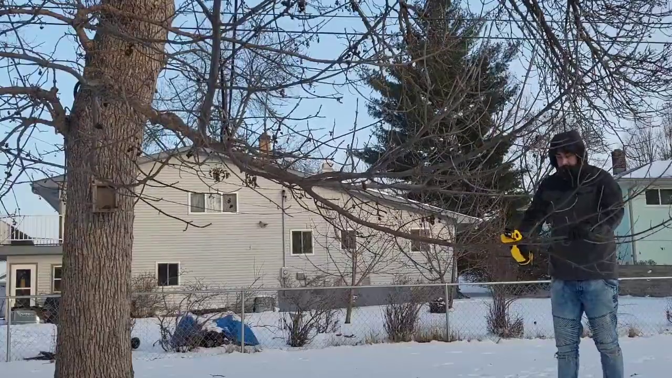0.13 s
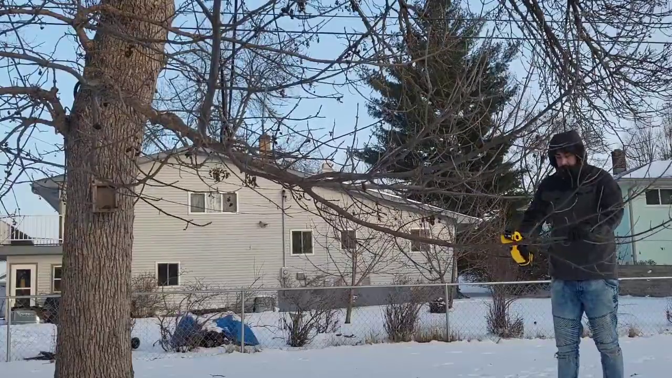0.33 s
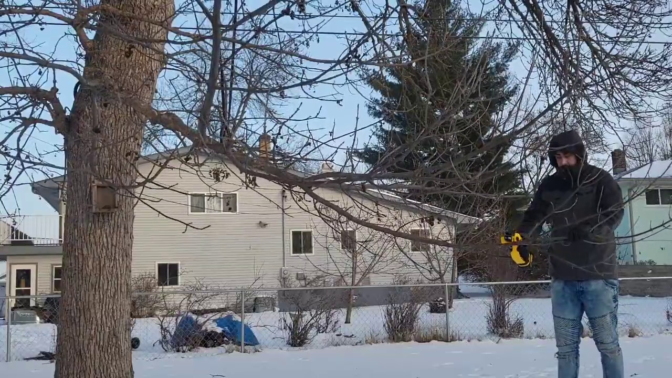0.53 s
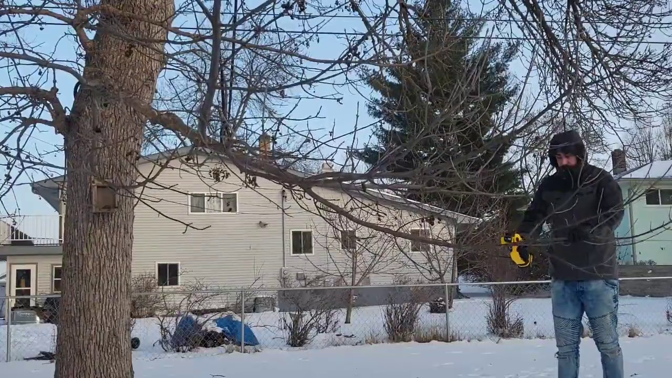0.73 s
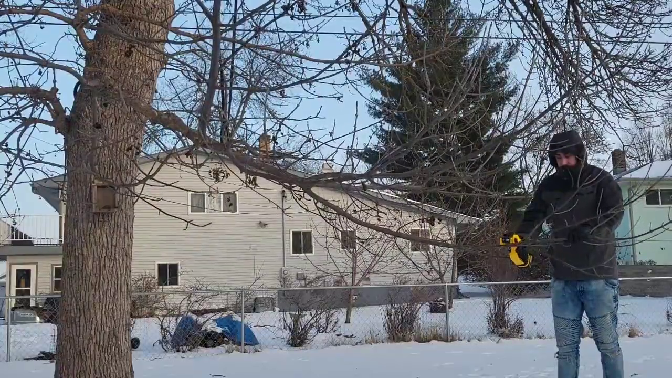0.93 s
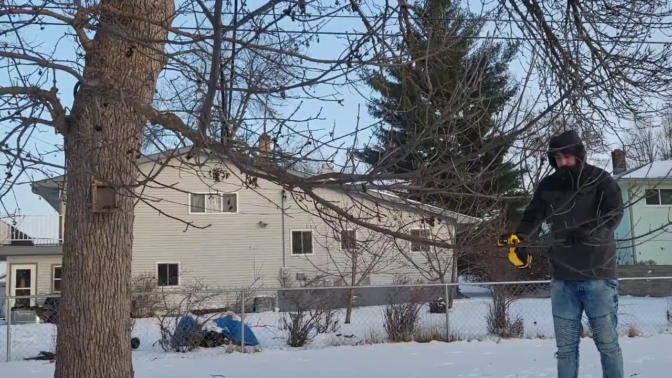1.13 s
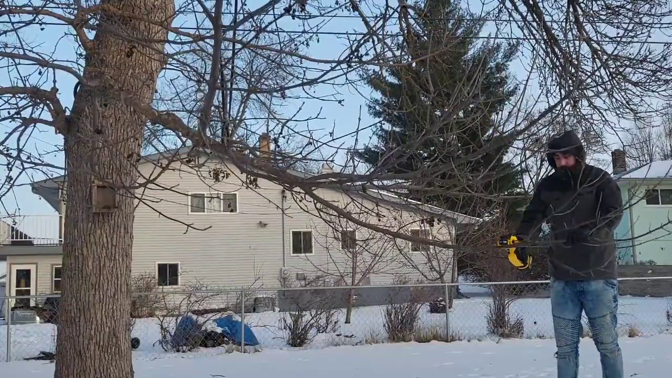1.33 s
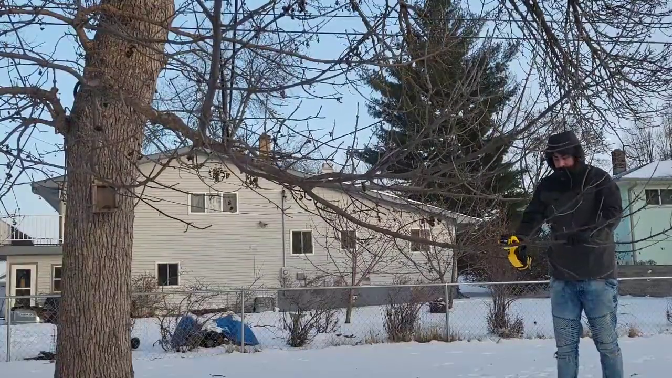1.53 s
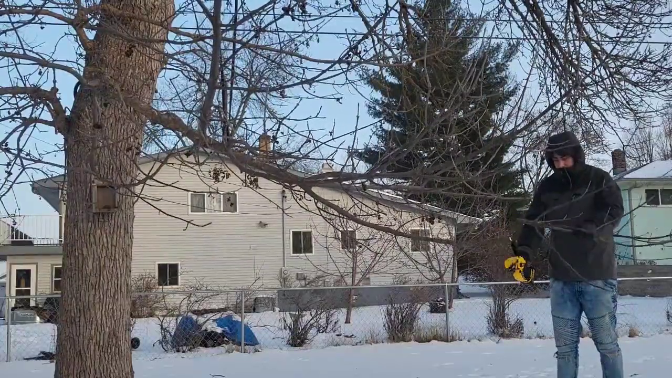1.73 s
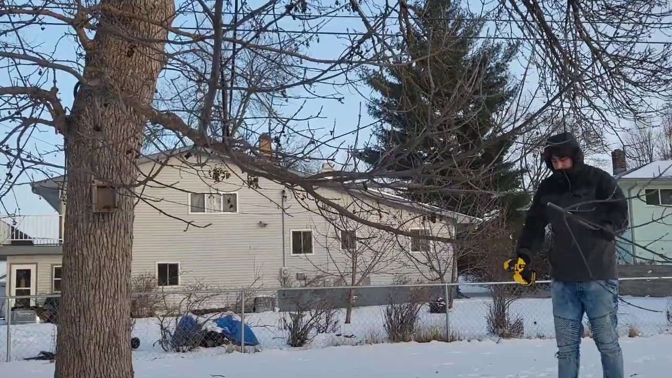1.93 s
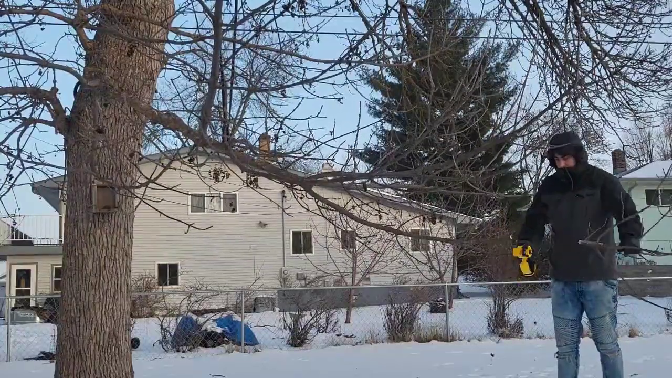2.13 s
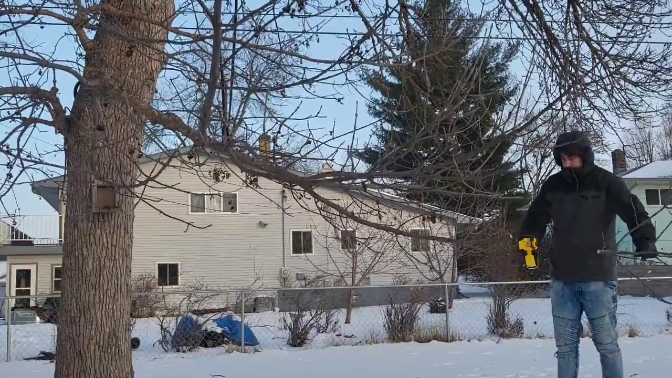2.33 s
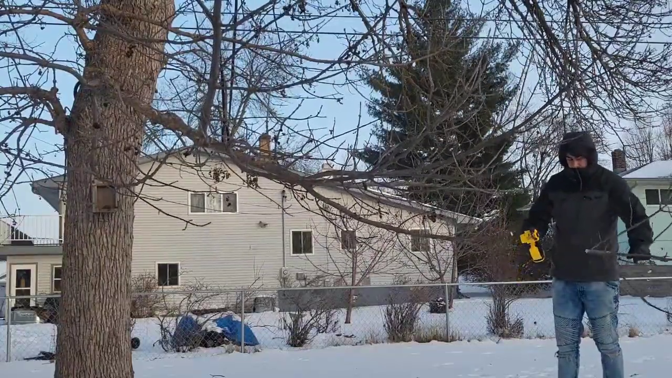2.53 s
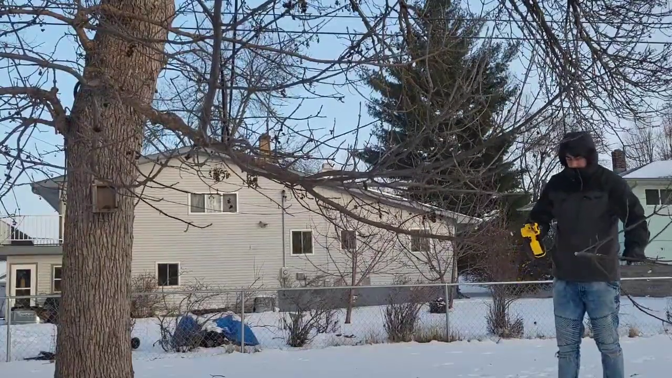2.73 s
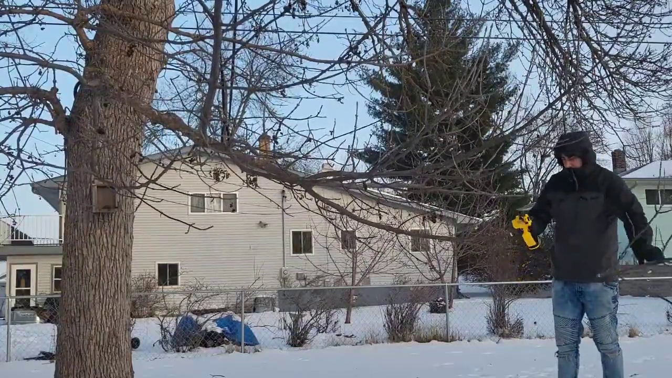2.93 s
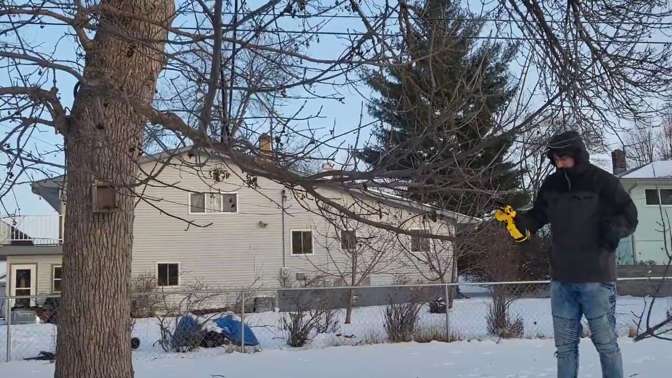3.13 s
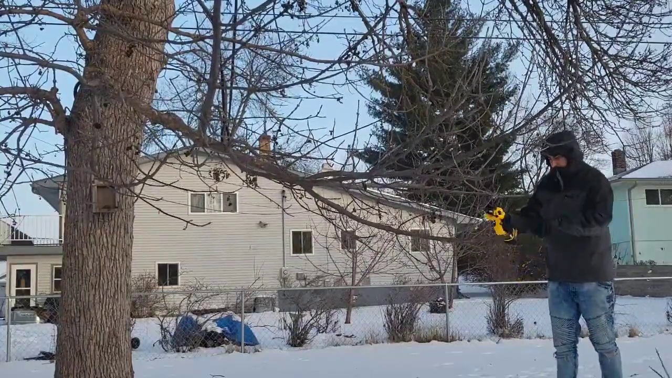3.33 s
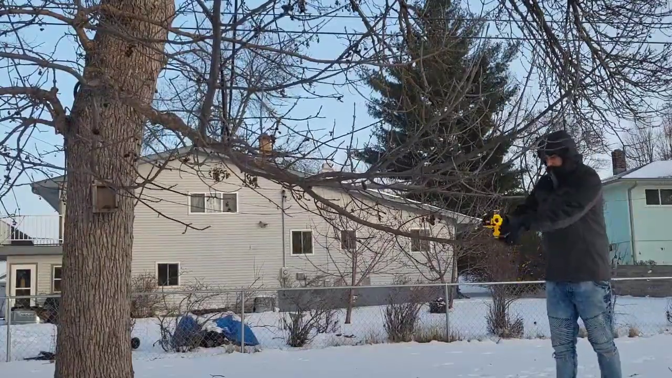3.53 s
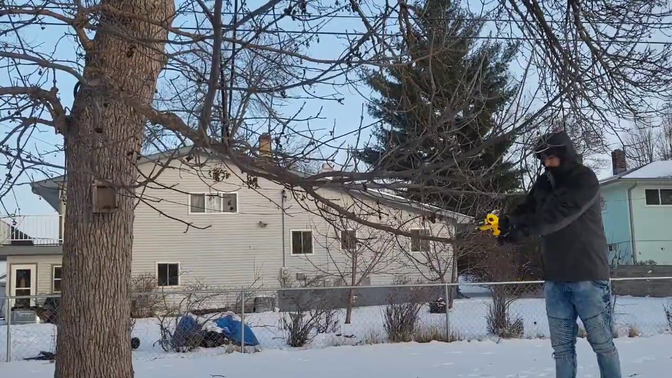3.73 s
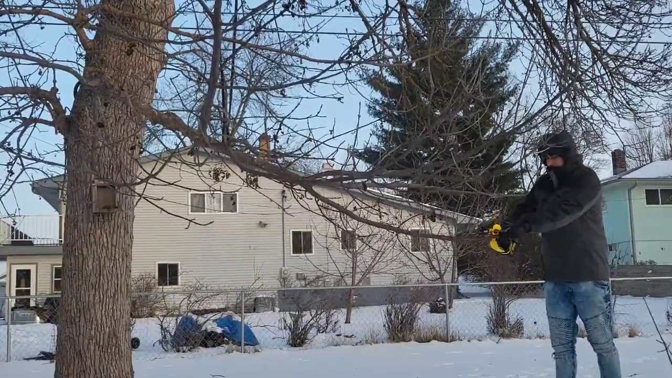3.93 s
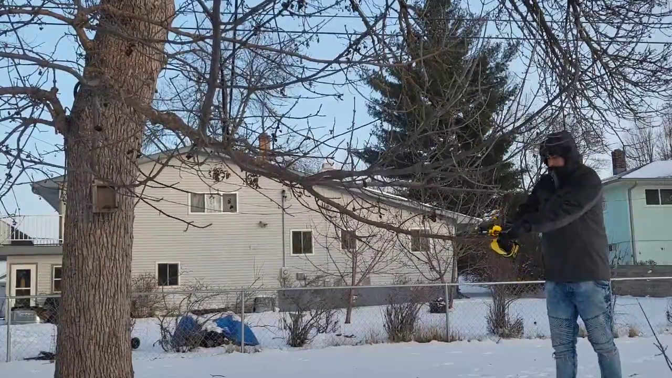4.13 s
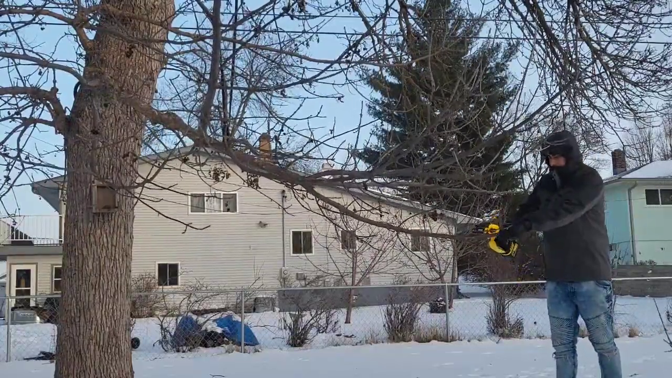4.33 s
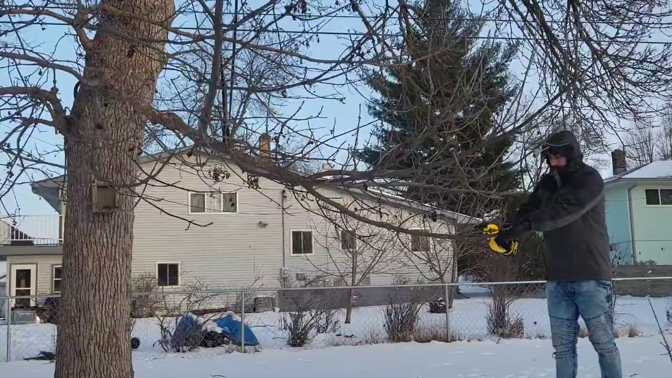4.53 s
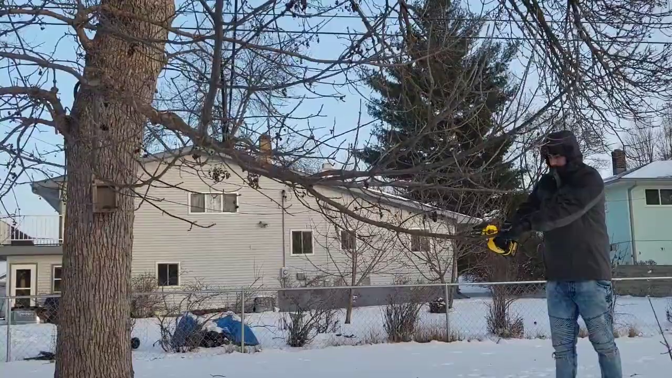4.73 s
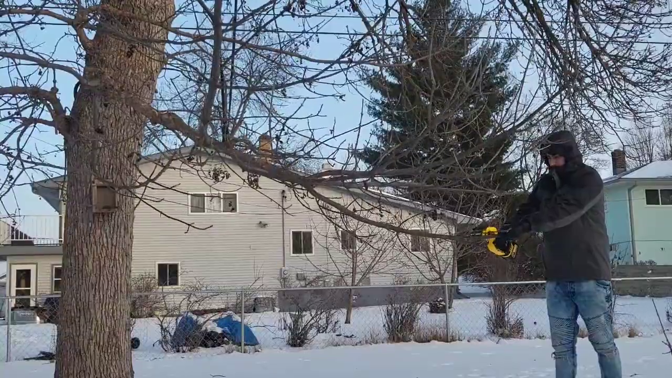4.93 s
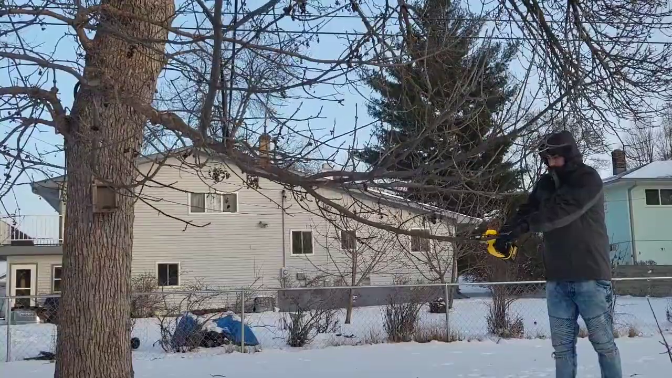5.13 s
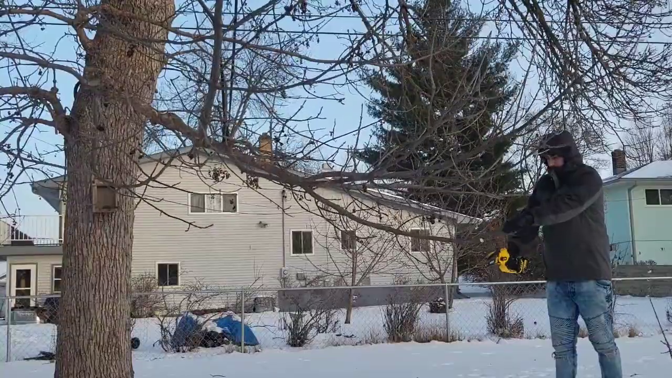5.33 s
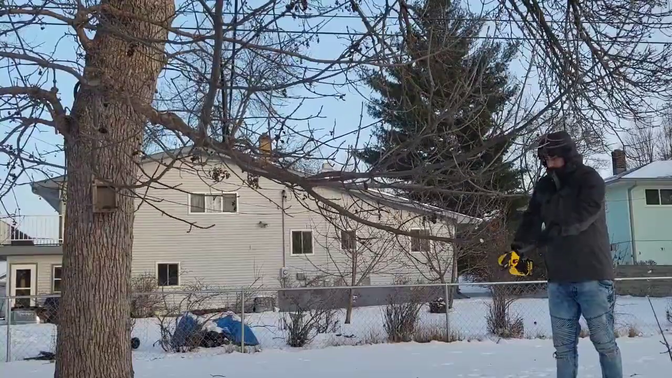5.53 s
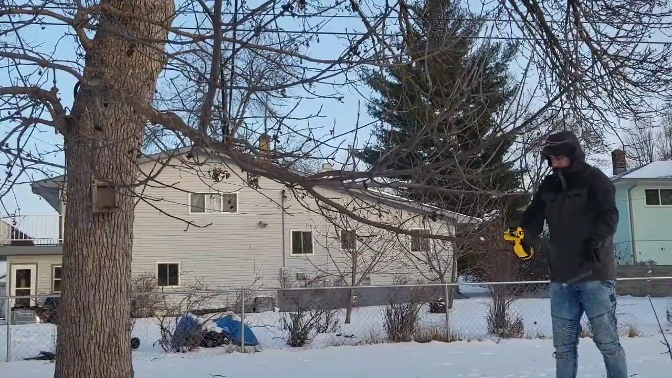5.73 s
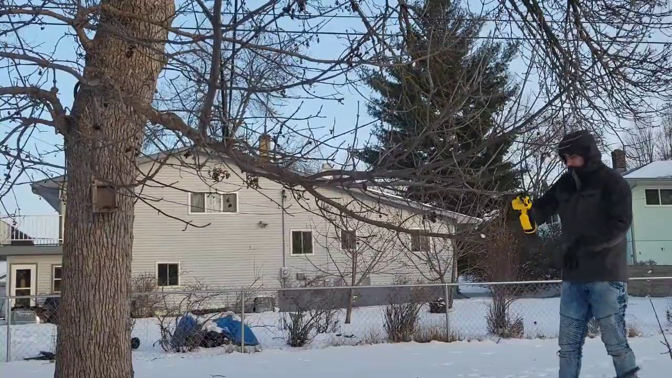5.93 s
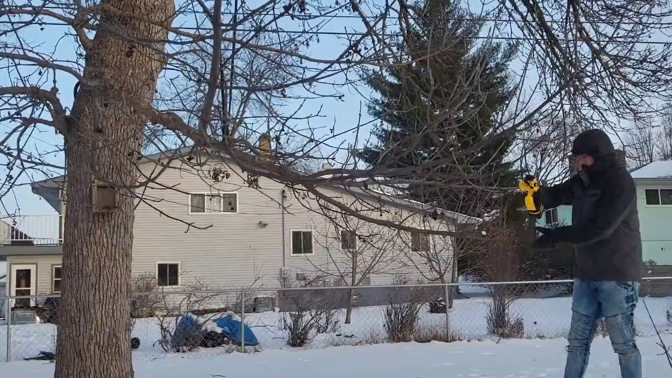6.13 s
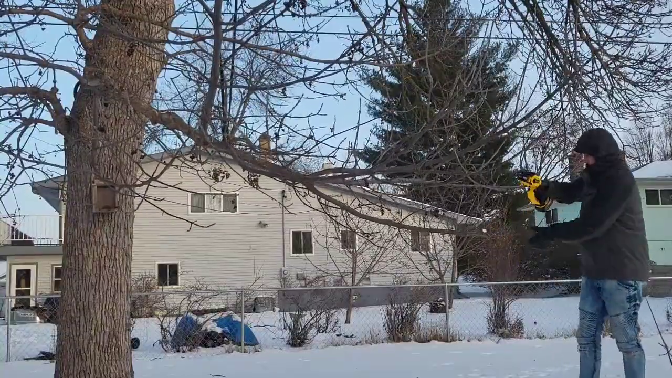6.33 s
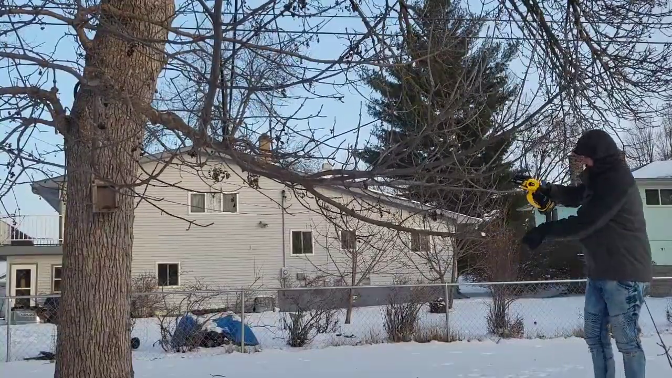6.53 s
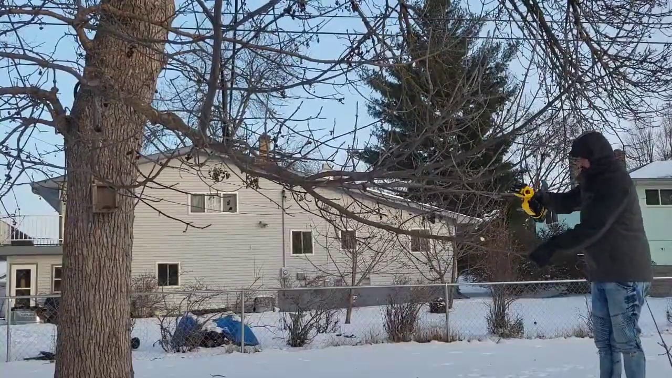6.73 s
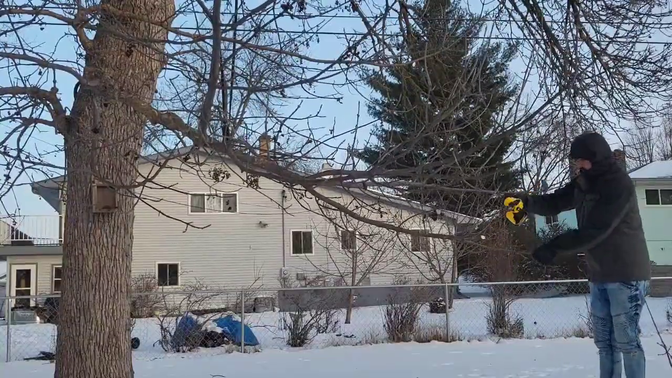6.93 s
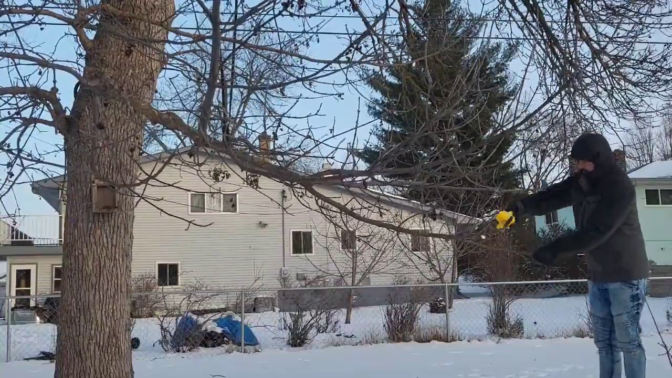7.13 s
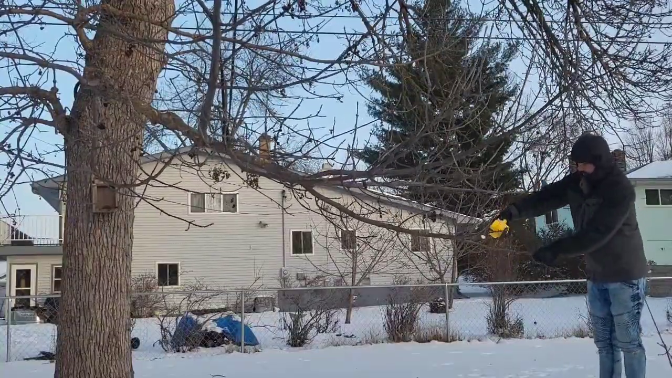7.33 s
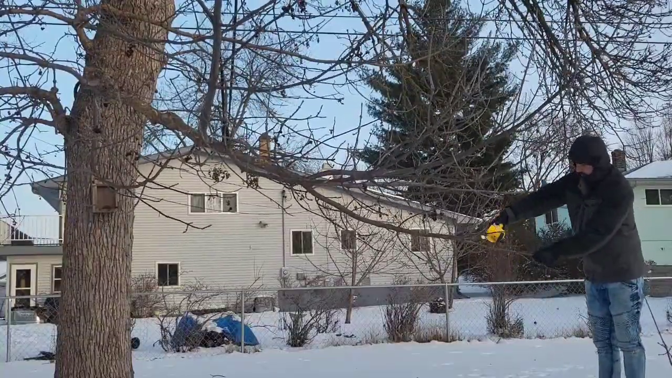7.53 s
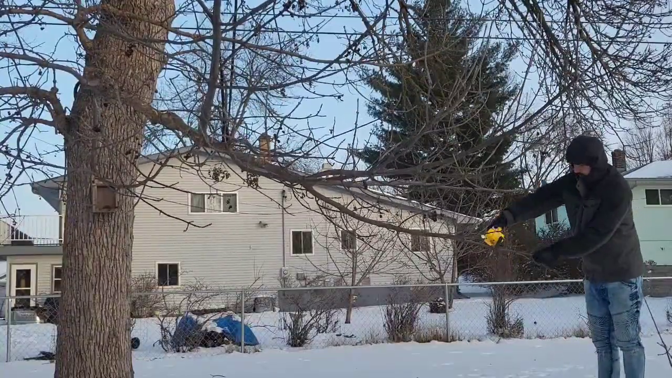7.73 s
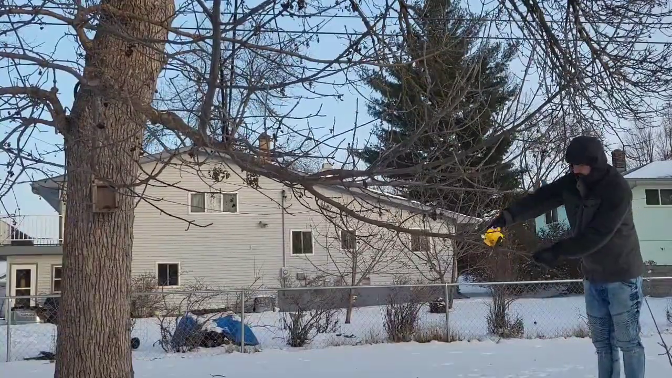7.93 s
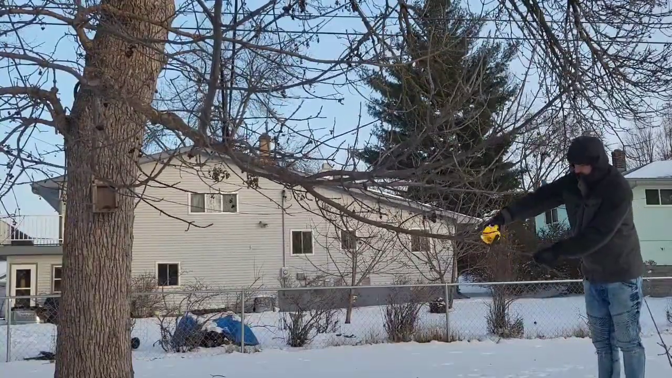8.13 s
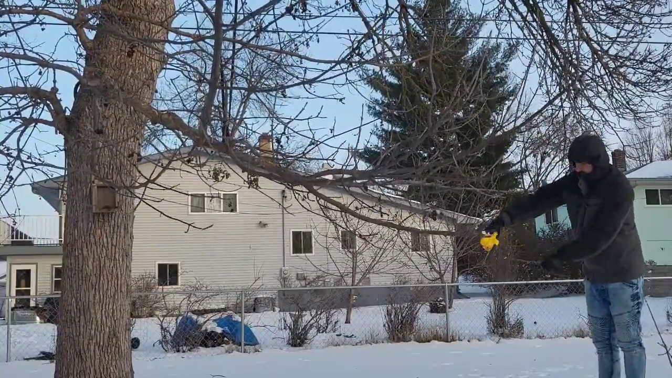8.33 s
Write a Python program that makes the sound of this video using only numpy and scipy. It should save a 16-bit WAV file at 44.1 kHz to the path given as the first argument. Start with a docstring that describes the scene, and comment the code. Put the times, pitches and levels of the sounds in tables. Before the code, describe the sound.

Outdoors, a rattling battery chainsaw runs, bites wood and stops abruptly three times, separated by quiet pauses of wind puffs and falling twigs.

```python
"""A small chainsaw trims twigs three times in a snowy yard, to the left of a two-port microphone.
The chain rattles as grains of noise ringing the bar and housing, with motor tones beneath it.
Tooth blows shake the wood and throw chips; twigs snap, rustle and land in the snow as short bursts.
Puffs of wind thump each port over a faint town hum, and house walls send a short tail back."""
import sys
import numpy as np
from scipy import signal
from scipy.fft import rfft, irfft
from scipy.io import wavfile
from scipy.ndimage import uniform_filter1d

SR = 44100
rng = np.random.default_rng(int(sys.argv[2]) if len(sys.argv) > 2 else 0)


def digitize_waveform(pressure):
    """Quantize a signal to 16-bit integers and store it at the path in sys.argv[1].

    Rows of a 2-D input are taken as channels; values are limited to [-1, 1].
    """
    field = np.atleast_2d(pressure).T
    bounded = np.clip(field, -1, 1)
    quanta = np.round(bounded * 32767).astype(np.int16)
    wavfile.write(sys.argv[1], SR, quanta)


def gain_from_db(level_db):
    """Turn a decibel level (scalar or array-like) into a linear amplitude factor."""
    decades = np.asarray(level_db, float) / 20
    return 10 ** decades


N = 369116
T = np.arange(N) / SR  # time in s

# Trigger pulls: on t/s, off t/s, spin-up time/s, chain level at full speed/dB,
# tilt of the case ring as the saw is turned [dB per octave]
RUNS = [(-.17, 1.94, .2, -32, -0.2), (4.15, 5.465, .18, -33.5, -1), (7.37, 8.6, .26, -33.5, 3)]
# The hand presses the bar into the wood, one list per cut: t/s, pressure/dB
FEED = [
    [(.57, -27.5), (.62, -10), (.84, -10), (.92, -1.5), (1.3, -4.5), (1.6, 1.5), (1.66, -7)],
    [(4.28, -20.5), (4.4, -10), (4.5, -4), (4.6, -0.2), (5.05, -3), (5.24, 1), (5.28, -19.5)],
    [(7.655, -21), (7.67, -6), (7.9, 3), (8.1, 2.5), (8.18, -6), (8.28, -4.5), (8.31, -5.5)],
]


def evened(x):
    """Scales to rms 1."""
    return x / np.sqrt(np.mean(x ** 2) + 1e-20)


def read(points, hz, order=1):
    """Reads one column of a table, joining its points along a log-frequency axis."""
    table = np.transpose(points)
    return np.interp(np.log(hz + 1), np.log(table[0] + 1), table[order])


def track(tables, order=1, rest=-120):
    """Joins one column of several curves into one control over time, at rest elsewhere."""
    out = np.full(N, float(rest))
    for rows in tables:
        table = np.transpose(rows)
        on = (T >= table[0, 0]) & (T <= table[0, -1])
        out[on] = np.interp(T[on], table[0], table[order])
    return out


def colour(x, points):
    """Shapes the spectrum with a minimum-phase filter that keeps the power of white noise."""
    hz = abs(np.fft.fftfreq(4096, 1 / SR))
    log_gain = np.log(gain_from_db(np.maximum(read(points, hz), -100)))
    response = np.exp(np.conj(signal.hilbert(log_gain)))
    impulse = np.fft.ifft(response).real[:2048]
    return signal.oaconvolve(x, impulse / np.linalg.norm(impulse))[:N]


def resonate(x, hz, width):
    """Rings one mode, a two-pole filter that keeps the power of white noise."""
    r = np.exp(-np.pi * width / SR)
    gain = np.sqrt((1 - r * r) / 2)
    poles = [1, -2 * r * np.cos(2 * np.pi * hz / SR), r * r]
    return signal.lfilter([gain, 0, -gain], poles, x)


def grains(per_s, spread_db, hiss):
    """Random ticks, a few of them large, over a bed of hiss."""
    size = gain_from_db(spread_db * np.minimum(rng.exponential(1, N), 3))
    ticks = (rng.random(N) < per_s / SR) * size * rng.standard_normal(N)
    return evened(evened(ticks) + hiss * rng.standard_normal(N))


def hum():
    """Distant town noise with slow patches, much more alike at the two ports in the bass."""
    # Hum and hiss at the left port: f/Hz, level/dB
    hum_colour = [(60, -88), (200, -104), (400, -88.5), (750, -95), (1230, -99), (1600, -106), (1950, -104),
                  (2400, -118), (4500, -121), (6500, -111), (8000, -119), (10500, -114.5), (12500, -122),
                  (15600, -119)]
    # How the right port differs: f/Hz, level relative to left/dB, likeness [0 to 1]
    port_likeness = [(100.7, -3.5, 1), (491, -2.5, 1), (1603, -4, 0.28), (3000, -5.5, 0.33),
                     (6520, -12, 0.15), (15970, -4, 0.2)]
    frames, hz = N // 256 + 5, np.fft.rfftfreq(1024, 1 / SR)
    a, b, c, d, patches = rng.standard_normal((frames, 513, 5)).T
    patches = evened(uniform_filter1d(uniform_filter1d(patches, 10, 0), 20, 1))
    same = np.clip(read(port_likeness, hz, order=2), -1, 1)[:, None]
    lag = np.exp(-2j * np.pi * hz * 0.00022)[:, None]  # the right port hears it 0.22 ms later
    left = a + 1j * b
    right = same * left * lag + np.sqrt(1 - same ** 2) * (c + 1j * d)
    right = right * gain_from_db(read(port_likeness, hz))[:, None]
    z = np.array([left, right]) * gain_from_db(read(hum_colour, hz)[:, None] + 0.43 * patches)
    return np.sqrt(SR / 512) * signal.istft(z, nperseg=1024, noverlap=768)[1][:, :N]


def drone():
    """A faint far tone: noise through one very narrow mode."""
    return gain_from_db(-72) * evened(resonate(rng.standard_normal(N), hz=1235, width=11))


def wind():
    """Pressure puffs, unrelated at each port, thump the microphone near its low resonance."""
    # Single puffs: t/s, level/dB, port hit [left or right]
    gusts = [(.24, -42, "left"), (1.62, -41.5, "left"), (5.05, -41, "right"), (1.32, -43.5, "right"),
             (2.766, -45.5, "left"), (2.795, -33, "left"), (3.006, -38, "left"), (3.144, -25, "left"),
             (3.228, -57, "left"), (4.095, -24.5, "left"), (4.147, -31.5, "left"), (4.841, -37, "left"),
             (5.428, -33.5, "left"), (5.848, -42, "right"), (5.898, -35.5, "right"), (6.029, -39, "right"),
             (6.233, -35, "left"), (6.289, -27, "left"), (6.641, -33.5, "right"), (6.992, -49, "right"),
             (7.167, -40.5, "left"), (7.351, -40.5, "right"), (7.519, -41.5, "left"),
             (7.668, -34.5, "right"), (7.855, -36.5, "left"), (8.111, -36, "left"), (8.199, -33, "right"),
             (8.261, -34, "left"), (8.305, -36, "left")]
    calm_db = np.array([[-64.5], [-66.5]])  # steady breeze at the left and right port
    swell_db, swell_s = -15.5, 0.089  # the breeze swells round each puff
    lee_db = -23  # the port that is not hit lies in the lee
    sides = np.array([["left"], ["right"]])
    peaks = [gain_from_db(db + lee_db * (sides != port)) for _, db, port in gusts]

    breeze = gain_from_db(calm_db)
    for (s, _, _), peak in zip(gusts, peaks):
        breeze = breeze + gain_from_db(swell_db) * peak * np.exp(-abs(T - s) / swell_s)
    out = np.zeros((2, N))
    for port in range(2):
        puffs = uniform_filter1d(uniform_filter1d(grains(73, 3.1, 0.2), 110), 110)
        low = resonate(resonate(puffs, 51, 42), 54, 100)
        high = resonate(resonate(puffs, 83, 60), 120, 150)
        out[port] = breeze[port] * evened(low + 0.095 * high)

    t = np.arange(-2000, 2000) / SR
    draws = rng.random((len(gusts), 3))
    for (s, _, _), peak, (pitch, phase, width) in zip(gusts, peaks, draws):
        swing = np.cos(2 * np.pi * ((52 + 14 * pitch) * t + phase))
        swing *= np.exp(-(t / (0.011 + 0.011 * width)) ** 2)
        # a quicker, higher flutter at the middle of the puff
        flutter = 0.62 * np.cos(2 * np.pi * (125 * t + 2 * phase)) * np.exp(-(t / 0.0058) ** 2)
        part = out[:, round(s * SR) - 2000:][:, :len(t)]
        part += peak * (swing + flutter)[:part.shape[1]]
    return out


def thuds():
    """Cut twigs land in the snow: short soft pushes of a low tone."""
    # Landings: t/s, level/dB
    landings = [(5.755, -49), (5.998, -40), (6.148, -44), (6.389, -40.5), (6.444, -42.5), (6.653, -43.5)]
    t, out = np.arange(-600, 600) / SR, np.zeros(N)
    for (s, db), (pitch, phase) in zip(landings, rng.random((len(landings), 2))):
        push = np.cos(2 * np.pi * ((200 + 70 * pitch) * t + phase)) * np.exp(-(t / 0.0023) ** 2)
        out[round(s * SR):][:len(t)] += gain_from_db(db) * push
    return out


def rustle():
    """Fine scratchy grains of bark on bark; each brush rises fast and dies away."""
    # Twigs brush past each other and fall: t/s, level/dB, dying [dB per s]
    brushes = [(3.08, -46, 171.5), (3.39, -58, 150), (3.72, -59, 175), (6.12, -51, 111), (6.3, -60, 42),
               (6.65, -61.5, 150), (7.25, -59, 59.5)]
    # Sound of the bark: f/Hz, relative level/dB
    bark_colour = [(300, -4), (900, 8), (2500, -5), (6500, 0.5), (8000, -8), (11000, -3.5), (15500, -6.5)]
    rise_db_per_s = 500
    level = np.zeros(N)
    for s, db, dying_db_per_s in brushes:
        level += gain_from_db(db - np.maximum(rise_db_per_s * (s - T), dying_db_per_s * (T - s)))
    return level * colour(grains(3000, 3, 0.71), bark_colour)


def snaps():
    """Twigs snap and the chain ticks: bursts of a few ms ring the knock, body and crack modes."""
    # Snaps and ticks: t/s, body level/dB, knock relative to body/dB, crack relative to body/dB
    breaks = [(1.046, -20.5, -24.5, -24.5), (1.5224, -15, -16.5, -12.5), (1.8382, -24.5, -30.5, -21.5),
              (3.047, -59.5, 6.5, -12), (4.181, -50.5, -19, -10), (4.2023, -45.5, -7, -12),
              (5.3717, -28, -24, -15), (6.1, -40, -33, 3), (6.315, -62.5, 12, 3), (6.6458, -70, -1, 11),
              (7.2285, -48.5, 0, 5), (7.2888, -41, -22, -10), (7.301, -58, -20, -3),
              (7.3213, -51.5, 2, -26), (7.352, -56, 0, -26), (7.4114, -41, -21, -17),
              (7.664, -32, -13.5, -5), (8.2844, -30.5, -10, -3)]
    # Twig modes, one knock, two body, two crack: f/Hz, width/Hz, level/dB
    twig_modes = [(670, 150, 9.5), (1450, 1000, 2), (2570, 400, -19), (5500, 1700, 7), (10380, 3800, -5.5)]
    drive = np.zeros((3, N))  # knock, body, crack
    t = np.arange(900) / SR
    bursts = rng.standard_normal((len(breaks), len(t)))
    for (s, db, knock_db, crack_db), burst in zip(breaks, bursts):
        part = drive[:, round(s * SR):][:, :len(t)]
        part += gain_from_db(db + np.array([[knock_db], [0], [crack_db]])) * burst * np.exp(-t / 0.0033)
    out = np.zeros(N)
    for k, (hz, width, db) in zip((0, 1, 1, 2, 2), twig_modes):
        out += gain_from_db(db) * resonate(drive[k], hz, width)
    return out


def bar_taps():
    """The idle bar taps a twig: a tick of noise with a short ring."""
    # Taps: t/s, level/dB
    touches = [(3.3335, -39.5), (3.380, -58), (3.964, -61), (6.8174, -53)]
    ring_hz, width_hz, tick_db = 2344, 160, 4.7
    t, out = np.arange(900) / SR, np.zeros(N)
    ring = np.sin(2 * np.pi * ring_hz * t) * np.exp(-np.pi * width_hz * t)
    ring *= np.minimum(t / 0.0012, 1)
    for (s, db), burst in zip(touches, rng.standard_normal((len(touches), len(t)))):
        tick = gain_from_db(tick_db) * uniform_filter1d(burst, size=7) * np.exp(-t / 0.0015)
        out[round(s * SR):][:len(t)] += gain_from_db(db) * (2 * ring + tick)
    return out


def squeals():
    """The cut pinches the bar, which squeals as a wavering tone with an overtone."""
    # Squeals: t/s, length/s, f/Hz, level/dB
    pinches = [(8.12, .14, 750, -36), (8.2, .08, 6280, -42)]
    waver = 1 + 0.26 * evened(uniform_filter1d(rng.standard_normal(N), 500))
    out = np.zeros(N)
    for s, length, hz, db in pinches:
        done = np.clip((T - s) / length, 0, 1)  # share of the squeal that has passed
        bent_hz = hz * (1 + 0.02 * np.sin(3 * np.pi * done))
        turn = 2 * np.pi * np.cumsum(bent_hz) / SR
        tone = 1.4 * np.sin(turn) + 0.5 * np.sin(2 * turn)
        out += gain_from_db(db) * np.sin(np.pi * done ** 1.3) ** 2 * waver * tone
    return out


def start_whines():
    """The motor whines briefly as it takes up current: noise through a narrow mode, twice."""
    # Whines: t/s, length/s, f/Hz, level/dB
    whines = [(4.161, .022, 3280, -51.5), (7.389, 0.0139, 3370, -45.5)]
    out = np.zeros(N)
    for s, length, hz, db in whines:
        gate = np.clip(np.minimum(T - s, s + length - T) / 0.002, 0, 1)
        whine = resonate(resonate(rng.standard_normal(N), hz, 150), hz, 150)
        out += gain_from_db(db) * gate * evened(whine)
    return out


def cutting():
    """One stream of tooth blows shakes the branch, rings the bar and throws chips."""
    # The cutters grab the wood: t/s, level/dB
    bites = [(0.608, -35), (0.661, -39.5), (0.86, -34), (0.881, -29), (0.965, -34), (1.01, -34),
             (1.048, -29), (1.08, -37), (1.137, -26.5), (1.18, -34), (1.199, -32.5), (1.253, -26.5),
             (1.31, -29.5), (1.329, -32.5), (1.37, -30), (1.389, -29), (1.427, -31.5), (1.441, -30),
             (1.49, -33), (1.528, -31), (1.611, -33), (4.434, -35.5), (4.497, -35.5), (4.706, -33),
             (1.591, -29.5), (4.582, -31.5), (4.622, -33), (4.731, -38), (4.838, -31.5), (4.934, -35),
             (4.97, -33.5), (5.01, -31), (5.045, -30), (5.084, -35.5), (5.11, -32), (5.179, -34),
             (5.208, -36.5), (5.253, -33), (7.819, -30.5), (7.889, -29), (7.7, -36.5), (7.745, -35),
             (7.971, -38), (8.0, -37), (8.1, -34), (8.117, -34), (8.281, -37.5)]
    # One branch per cut: wood/dB, bar ring/dB, chip spray/dB at 0 dB pressure,
    # bar ring of a grab relative to its strength/dB
    branches = [(-35, -37, -33, 1.5), (-33, -32, -31.5, 5), (-37.5, -59, -29, -4.5)]
    # Sound of the wood: f/Hz, relative level/dB
    wood_colour = [(100, -9), (150, -5.5), (220, -18), (430, 5.5), (560, -0.5), (660, 0.5), (950, -6.5),
                   (1300, 1), (2100, -13.5), (8000, -48)]
    # Sound of the flying chips: f/Hz, relative level/dB
    chip_colour = [(1000, -24), (2200, 1), (3300, 1), (6500, 3), (8000, -7), (10000, -0.5), (13500, 4.5),
                   (15500, -1.5)]
    # Modes of the bar: f/Hz, width/Hz, level/dB
    bar_modes = [(2390, 110, -14.5), (2630, 140, -3), (2728, 150, -10.5)]
    ring_slope, spray_slope = 0.84, 0.52  # dB per dB of pressure

    s, db = np.transpose(bites)
    onset = np.zeros(N)
    onset[(s * SR).astype(int)] = gain_from_db(db)
    grab = signal.oaconvolve(onset, signal.windows.gaussian(2001, 0.0046 * SR), "same")

    cut_number = np.searchsorted([rows[0][0] for rows in FEED[1:]], T)
    wood_db, ring_db, spray_db, grab_ring_db = np.array(branches)[cut_number].T
    press = track(FEED, rest=-200)
    wood = gain_from_db(wood_db + press)
    ring = gain_from_db(ring_db + ring_slope * press)
    spray = gain_from_db(spray_db + spray_slope * press)

    # the bar jumps clear 27 ms after a grab
    jump = signal.oaconvolve(1.0 * (onset > 0), signal.windows.gaussian(2001, 0.007 * SR), "same")
    contact = 1 - np.clip(0.56 * np.roll(jump, round(0.027 * SR)), 0, 0.9)
    wood, ring = wood * contact, ring * contact

    blows = grains(2800, 3.3, 0.5)
    bar_drive = np.hypot(ring, gain_from_db(grab_ring_db) * grab) * blows
    bar = sum(gain_from_db(db) * resonate(bar_drive, hz, width) for hz, width, db in bar_modes)
    # each grab throws more chips
    chips = spray * np.sqrt(0.9 + 0.59 * np.minimum(grab / wood, 3) ** 2) * blows
    return colour(np.hypot(wood, grab) * blows, wood_colour) + bar + colour(chips, chip_colour)


def motor_speed():
    """Sprocket turns per second and chain level: soft start, sag under load, quick brake."""
    free_hz, sag_hz = 61.8, 4.5  # turns running free, and the loss under load
    brake_hz_per_s, stop_s = 450, 0.035  # the brake drags the chain down, then locks it
    loudness_power = 1.36  # the rattle grows as this power of the unloaded speed
    load = uniform_filter1d(1.0 * (track(FEED) > -9), 2000)
    hz, level = np.zeros(N), np.zeros(N)
    for on, off, spin_s, db, _ in RUNS:
        free = free_hz * (1 - np.exp(-np.maximum((T - on) / spin_s, 0) ** 1.4))
        free -= brake_hz_per_s * np.maximum(T - off, 0)
        free *= np.clip((off + stop_s - T) / 0.014, 0, 1)
        hz += np.maximum(free - sag_hz * load, 0)
        level += gain_from_db(db) * np.maximum(free / free_hz, 0) ** loudness_power
    return hz, level


def chain():
    """Links rattle through the sprocket into the case modes; the motor hums on multiples of the turn."""
    # Sound of the rattling links: f/Hz, relative level/dB
    link_colour = [(250, -22), (400, -4.5), (830, 4), (1000, -14.5), (1700, 6.5), (2100, -2), (3150, -4),
                   (3800, 3), (5600, 0.5), (7000, 1.5), (8000, -11.5), (10500, -3), (13500, -3.5),
                   (15600, -8.5)]
    # Modes of bar and housing: f/Hz, width/Hz, relative level/dB
    case_modes = [(1310, 160, -2.5), (2660, 380, -0.5), (3560, 250, -8.5), (5087, 190, -8), (6440, 320, -2)]
    # Motor tones: multiple of the sprocket turn, level relative to the rattle/dB
    motor_orders = [(6, -26), (7, -19), (14, -26), (21, -20)]
    hz, level = motor_speed()
    turn, speed = 2 * np.pi * np.cumsum(hz) / SR, np.clip(hz / 60, 0, 1)
    per_s = 5000 * speed ** 3 + 500  # a slow chain ticks link by link, a fast one blurs
    swing = 1 + 0.13 * np.cos(turn) + 0.064 * np.cos(2 * turn + 0.29)
    swing /= np.sqrt(per_s)  # denser ticks are each weaker
    hiss = 0.4 + 0.6 * speed
    links = evened(swing * grains(per_s, 2.2, hiss))
    case_drive = evened(swing * grains(per_s, 2.2, hiss))

    run_number = np.searchsorted([row[0] for row in RUNS[1:]], T)
    tilt = np.transpose(RUNS)[4][run_number]
    body = colour(links, link_colour)
    for mode_hz, width, db in case_modes:
        gain = gain_from_db(db + tilt * np.log2(mode_hz / 4000))
        body += gain * resonate(case_drive, mode_hz, width) / 2
    motor = sum(gain_from_db(db) * np.sin(k * turn + 7 * rng.random()) for k, db in motor_orders)
    return level * (evened(body) + speed ** 4 * motor)


def walls(x):
    """Adds sparse echoes from houses and fences, each band dying at its own speed."""
    # Time for the echoes to fall by 60 dB: f/Hz, time/s
    wall_decay = [(300, 0.55), (2500, .5), (5000, 0.6), (15000, 0.47)]
    tail_db = -17.5
    echoes = np.zeros(SR)
    at = np.arange(900, SR - 20, 20)
    echoes[at + rng.integers(0, 20, len(at))] = rng.choice([-1.0, 1.0], len(at))
    hz, t, z = signal.stft(echoes, SR, nperseg=256)
    fading = gain_from_db(-60 * t / read(wall_decay, hz)[:, None])
    tail = signal.istft(z * fading, SR, nperseg=256)[1]
    return x + gain_from_db(tail_db) * signal.oaconvolve(x, tail / np.linalg.norm(tail))[:N]


def ports(x):
    """The right port hears it later, duller, and partly scattered round the case and off the ground."""
    # The case shadows the far port: f/Hz, level/dB, likeness [0 to 1], extra phase [radians]
    shadow = [(150, 0, .95, .2), (500, -2.5, .95, .2), (1000, -2.5, .87, .3), (1550, -.5, .98, .38),
              (2200, -1.5, .75, .1), (2700, -3.5, .88, .1), (3200, -5, .62, 0), (6000, -12, .45, .2),
              (7000, -15, .3, 1.8), (8500, -11, .35, 2.8), (12000, -16, .5, 2.8), (15000, -21, .3, 4)]
    lag = 16  # samples
    hz = np.fft.rfftfreq(8192, 1 / SR)
    same = np.clip(read(shadow, hz, order=2), 0, 1)
    direct = np.exp(1j * (read(shadow, hz, order=3) - 2 * np.pi * hz * lag / SR))
    scatter = rfft(rng.standard_normal(4000) * np.exp(-np.arange(4000) / 1500), 8192)
    scatter /= np.sqrt(uniform_filter1d(abs(scatter) ** 2, 40))
    gain = gain_from_db(read(shadow, hz)) * (same * direct + np.sqrt(1 - same ** 2) * scatter)
    # roll by 512 samples so that the filter may also reach slightly ahead
    right = signal.oaconvolve(x, np.roll(irfft(gain), 512))[512:N + 512]
    return np.array([x, right])


def scene():
    """Saw, twigs and far tone in the yard, then wind and hum at the ports."""
    saw = chain() + cutting() + squeals() + start_whines()
    twigs = snaps() + bar_taps() + rustle() + thuds()
    return ports(walls(saw + twigs + drone())) + wind() + hum()


def low_pass(x):
    """Removes everything above the highest recorded frequency."""
    return signal.sosfilt(signal.butter(12, 16100, fs=SR, output="sos"), x)


def record(dry):
    """Turns the finished mix into the sound that is written out."""
    return low_pass(dry)


dry = scene()
out = record(dry)
digitize_waveform(out)
```